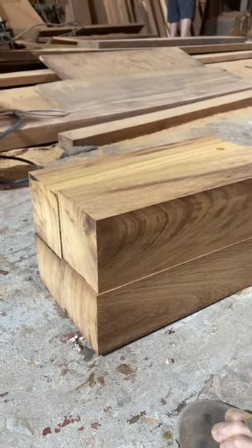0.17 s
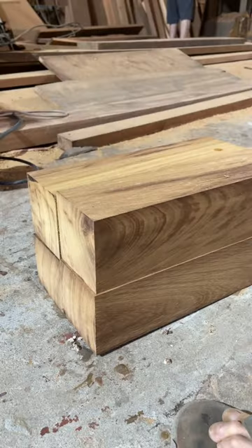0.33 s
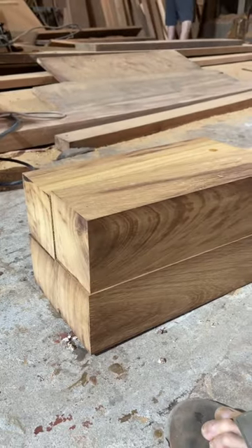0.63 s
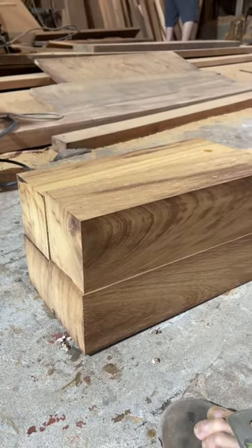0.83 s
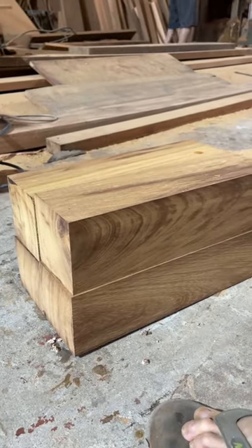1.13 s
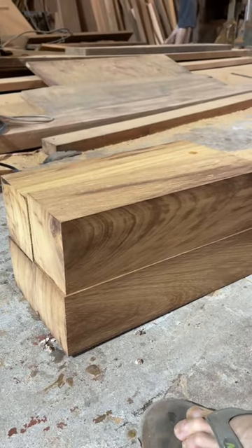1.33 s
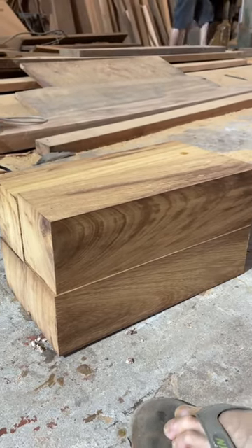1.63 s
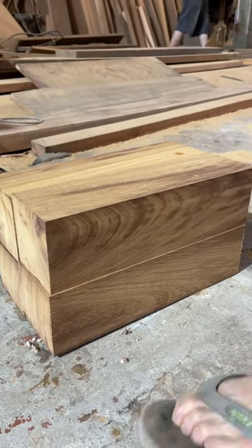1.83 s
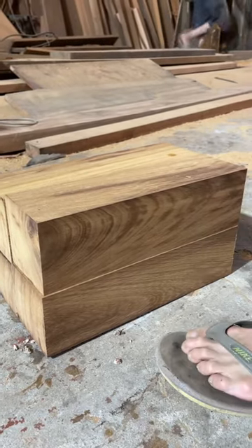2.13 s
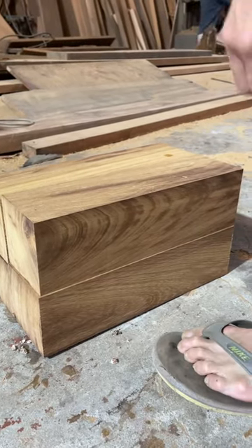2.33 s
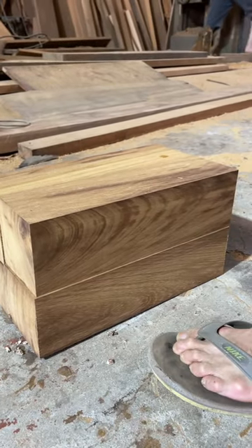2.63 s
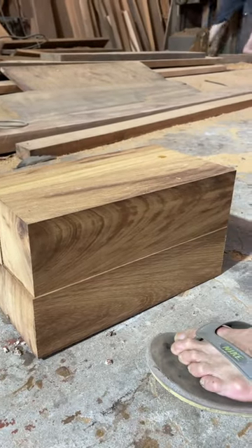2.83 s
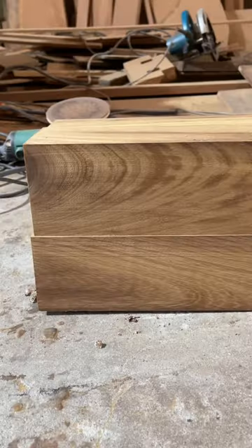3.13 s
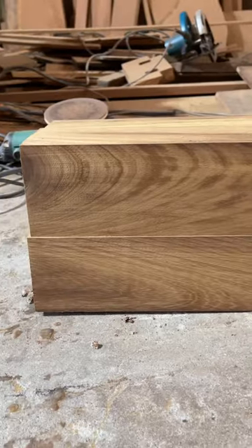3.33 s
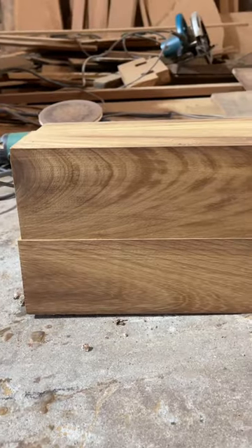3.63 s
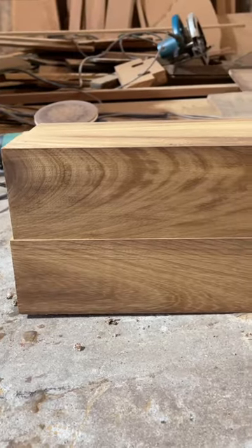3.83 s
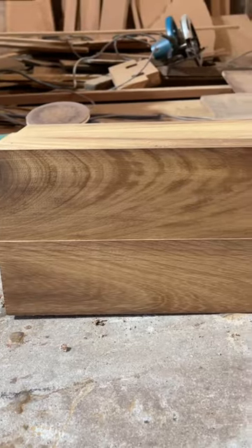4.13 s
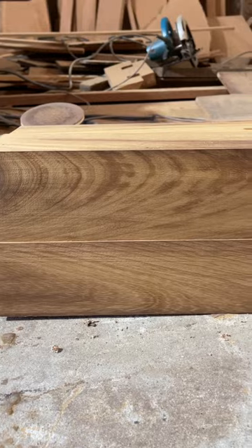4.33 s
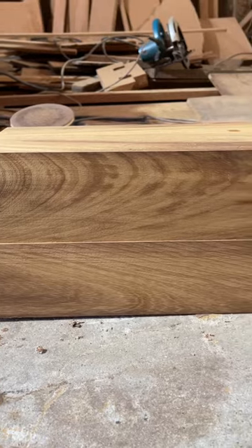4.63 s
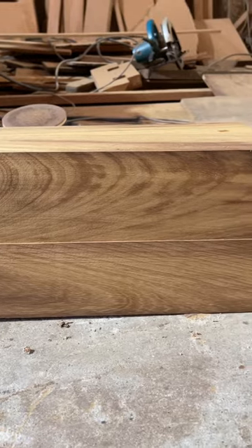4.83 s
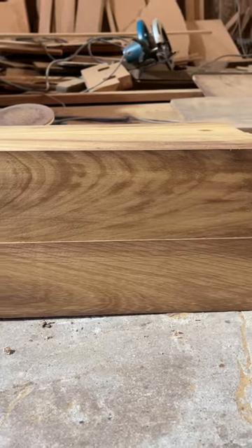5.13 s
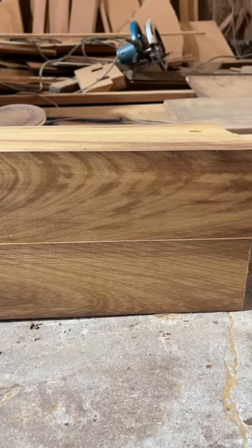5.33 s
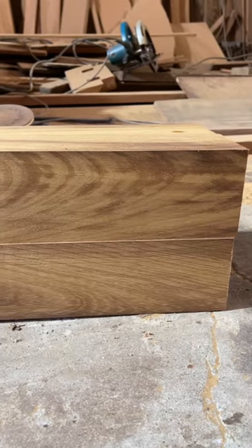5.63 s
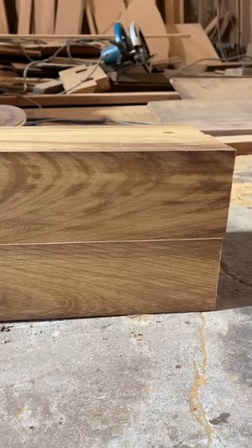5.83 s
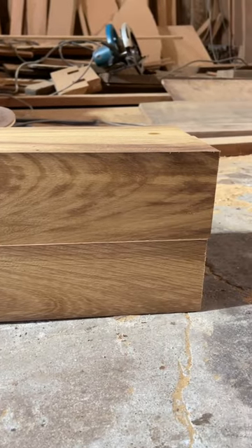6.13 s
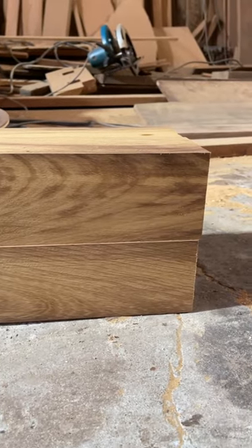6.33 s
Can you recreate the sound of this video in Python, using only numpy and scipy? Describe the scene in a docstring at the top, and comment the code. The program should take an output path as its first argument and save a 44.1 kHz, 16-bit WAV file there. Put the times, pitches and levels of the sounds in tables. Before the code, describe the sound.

A planing machine buzzes and squeals through wood, with a hiss of chips and a short splintering rasp. After a brief sandal scuff and a tiny gap, it runs empty with a steady drone, while a plank knocks sharply and echoes a little. Then a louder, harsher cut begins. The sound is picked up a few metres away in an open workshop, with gusts of wind thumping on the microphone throughout.

```python
"""A harsh, singing buzz opens the scene: a three-knife wood planer cuts a board in an open workshop.
Periodic knife blows force the wood to vibrate at harmonics of the shaft rate, and flying chips hiss.
A sandal scuffs, and the sound breaks off for an instant. The planer idles, humming like a siren as its
knives chop the air, while a plank is knocked down; then it bites into a second board. Throughout, a
breeze buffets the two microphone ports of a phone a few metres away."""
import sys
import numpy as np
from scipy import signal
from scipy.fft import rfft, irfft, next_fast_len
from scipy.io import wavfile
from scipy.ndimage import uniform_filter1d, map_coordinates

SR = 44100
rng = np.random.default_rng(int(sys.argv[2]) if len(sys.argv) > 2 else 0)


def dump_mix(stems):
    """Bounce the given channels to the path in sys.argv[1] as a 16-bit WAV at rate SR."""
    frames = np.atleast_2d(stems).T  # one column per channel
    limited = np.clip(frames, -1, 1)  # hard clip at full scale
    pcm = np.round(limited * 32767).astype(np.int16)
    wavfile.write(sys.argv[1], SR, pcm)


N = 286076
TIME, FREQS = np.arange(N) / SR, np.fft.rfftfreq(N, 1 / SR)
SHAFT_HZ = 79.62
SNAPS = (2.3, .7)  # extra blow of the proudest knife in each board
GRATE_CYCLES, GRATE_HZ = .04, 45  # depth and rate of the phase jitter from uneven blows

# Passes of a board over the knives. Each row: start and end in seconds.
FEED_SPANS = [(-.1, 2.85), (5.715, 6.6)]
# Resonances of the boards as the knives catch them. Each row: start and length in seconds, centre and
# width in Hz, level of the added band in dB relative to the plain cut, level of the squeal in dB.
BOARD_RESONANCES = [(0, 0.36, 2600, 510, 1, -49), (1.009, 0.62, 2448, 220, -8, -26),
                    (1.07, 0.65, 3970, 600, -9, -57), (1.55, 0.034, 4080, 300, 12, -41),
                    (1.963, 0.39, 2625, 226, -20, -32.5), (2.26, 0.53, 2545, 520, 1.5, -40.5),
                    (2.554, 0.29, 5830, 400, -13, -40), (5.743, 0.12, 3105, 160, -11, -28.5),
                    (5.737, 0.075, 3680, 500, -8, -33), (5.76, 0.66, 3660, 190, -12, -29),
                    (6.007, 0.33, 1080, 1620, -16, -52), (6.168, 0.29, 6300, 765, 4.5, -42)]
# How well the motor side of the machine is heard. Each row: time in seconds, gain in dB.
MOTOR_SIDE_GAIN = [(0, -1.5), (2.3, -1), (2.9, 3), (5.6, 2), (6.49, 4)]


def amp(db):
    """Decibels as an amplitude ratio."""
    return 10 ** (np.asarray(db) / 20)


def unit_rms(x):
    """Normalisation to a mean power of 1."""
    return x / np.sqrt(np.mean(x ** 2) + 1e-20)


def curve(rows, column=1):
    """Linear interpolation of one table column over time."""
    rows = np.array(rows)
    return np.interp(TIME, rows[:, 0], rows[:, column])


def bump(s, half):
    """A Gaussian swell that falls to 1/e at `half` seconds either side of its peak."""
    return np.exp(-np.minimum(((TIME - s) / half) ** 2, 50))


def gains(points):
    """A frequency response interpolated on a logarithmic frequency axis."""
    hz, db = np.transpose(points)
    return amp(np.interp(np.log(FREQS + 1), np.log(hz), db))


def colour(x, points):
    """Filtering by multiplication of spectra."""
    return irfft(rfft(x) * gains(points), N)


def wander(rate_hz, size=4096):
    """Low-pass noise of rms 1, for slow random modulation."""
    hz = np.arange(size // 2 + 1) * SR / N
    spectrum = rng.standard_normal((len(hz), 2)) @ [1, 1j]
    slow = unit_rms(irfft(spectrum * np.exp(-(hz / rate_hz) ** 2)))
    return np.interp(np.linspace(0, size - 1, N), np.arange(size), slow)


def tone(cycles, scatter=1.0):
    """A direct sinusoid of rms 1 and its scattered part, each at a random phase."""
    return np.sqrt(2) * np.array([[1], [scatter]]) * np.sin(2 * np.pi * (cycles + rng.random((2, 1))))


def ports(pair, response=1):
    """Interference at two ports: their sum and difference cancel in turn along the spectrum."""
    # Each row: frequency in Hz, phase lead of the left port in radians, correlation from -1 to 1.
    port_relation = [(0, .27, 0), (250, .6, 0), (600, .8, -.1), (1150, .95, -.4), (1800, .25, .3),
                     (2500, .75, .5), (3800, 1.05, .35), (4550, 1.8, .5), (4900, 3.14, .6),
                     (5950, 6.28, .65), (7600, 7.8, .63), (8500, 9, .8), (9400, 9.7, .8), (10700, 11, .65),
                     (11600, 12.57, .6), (12600, 12.25, .6)]
    hz, leads, correlations = np.transpose(port_relation)
    lead, correlation = np.interp(FREQS, hz, leads), np.interp(FREQS, hz, correlations)
    direct, scattered = rfft(pair) * response
    mid = np.cos(lead / 2) * direct
    side = 1j * np.sin(lead / 2) * (correlation * direct + np.sqrt(1 - correlation ** 2) * scattered)
    return irfft(np.array([mid + side, mid - side]), N)


def feeding(board, bite_s=.033):
    """Depth of the knives in one board, ramping between 0 and 1."""
    start, end = FEED_SPANS[board]
    return np.clip(np.minimum(TIME - start, end - TIME) / bite_s, 0, 1)


def strikes(turns, snap, knives=(1, .4, .3)):
    """Three decaying impacts a turn over a steady floor; one knife stands proud and snaps hardest."""
    knife = np.floor(turns * 3).astype(int) % 3
    since_blow = turns * 3 % 1
    return 1 + np.array(knives)[knife] * np.exp(-since_blow / .45) + snap * np.exp(-(turns % 1) / .04)


def buzz(turns, snap, hold_s=.5, flattening=.35, size=1024, count=130):
    """Quasi-periodic excitation: each turn repeats a rattle that changes slowly as the board slides."""
    span = max(2, round(hold_s * count * SR / N))
    rattles = uniform_filter1d(rng.standard_normal((2, 2 * count, size)), span, axis=1)
    rattles = rattles[:, count // 2:][:, :count]
    harmonics = rfft(rattles * strikes(np.arange(size) / size, snap))
    harmonics /= (abs(harmonics) + 1e-9) ** flattening
    order = np.arange(harmonics.shape[-1])
    on_knives = order % 3 == 0
    harmonics *= amp(5 * on_knives) * (order * SHAFT_HZ < SR / 2)
    place = [np.linspace(0, count - 1, N), turns % 1 * size]
    pair = [map_coordinates(shapes, place, order=1, mode="grid-wrap") for shapes in irfft(harmonics)]
    return unit_rms(np.array(pair))


def ringing(start, length, ramp_s=.014, fade_db=-1.5):
    """Envelope of a resonance: a quick attack, a slow fade, a quick release."""
    gate = np.clip(np.minimum(TIME - start, start + length - TIME) / ramp_s + .5, 0, 1)
    return gate * amp(fade_db * np.clip((TIME - start) / length, 0, 1))


def resonating(drive, board):
    """Resonance: for a while, the board reinforces the excitation in a band around each peak."""
    out = drive.copy()
    for start, length, hz, width_hz, db, _ in BOARD_RESONANCES:
        if FEED_SPANS[board][0] < start < FEED_SPANS[board][1]:
            envelope = ringing(start, length)
            on = envelope > 0
            size = next_fast_len(int(on.sum()), True)
            peak = np.exp(-((np.fft.rfftfreq(size, 1 / SR) - hz) / width_hz) ** 2 * 2)
            band = irfft(rfft(drive[:, on], size) * peak, size)[:, :on.sum()]
            out[:, on] += amp(db) * envelope[on] * band
    return out


def sliding(x, depth_db=1.6):
    """Time-varying filtering: as the board slides, patches of its spectrum swell and fade."""
    spectra = signal.stft(x, nperseg=512)[2]
    patches = rng.standard_normal(spectra.shape[1:])
    for _ in range(2):
        patches = uniform_filter1d(uniform_filter1d(patches, 3, axis=0), 22, axis=1)
    return signal.istft(spectra * amp(depth_db * unit_rms(patches)), nperseg=512)[1][:, :N]


def cutting(turns, split_hz=4950, chatter_hz=8.3, chatter_db=1.37):
    """Forced vibration: knife blows ring the board; fibres and chips add a puff of noise to each."""
    # One table a board. Each row: time in seconds, knife force and chip hiss in relative dB.
    passes = [
        [(0.02, -29, -32), (0.6, -38.5, -34.5), (0.97, -34.5, -35), (1.1, -26.5, -32), (1.66, -29.5, -33),
         (1.9, -29, -33), (2.49, -34.5, -36), (2.66, -32, -31), (2.82, -36.5, -32.5)],
        [(5.76, -26.5, -23.5), (5.944, -29.5, -26), (6.174, -23.5, -26), (6.312, -25.5, -19.5),
         (6.48, -27, -26)],
    ]
    # One spectrum a board. Each row: frequency in Hz, relative density in dB.
    board_spectra = [
        [(300, -76.5), (550, -63.5), (750, -69), (1050, -68.5), (1300, -65.5), (1800, -63), (2400, -61),
         (3200, -65.5), (4200, -59.5), (5500, -52.5), (7500, -54.5), (9700, -51), (11200, -57), (12600, -87)],
        [(300, -103), (550, -78), (750, -56.5), (1000, -58), (1300, -58), (1800, -58), (2400, -53.5),
         (3100, -50.5), (3700, -51.5), (4600, -56), (6400, -64), (9500, -60.5), (11200, -69), (12600, -85)],
    ]
    depth = amp(.6 * rng.standard_normal(1024)[turns.astype(int)])  # no two turns cut equally deep
    low = 1 / (1 + (FREQS / split_hz) ** 16)
    # Wood, then chips. Each row: frequency response, gain in dB, factor on the share of noise.
    bands = [(low, -2.0, .7), (1 - low, -2.6, 1.1)]
    out = 0
    for board, (levels, spectrum) in enumerate(zip(passes, board_spectra)):
        periodic = buzz(turns, SNAPS[board])
        puffs = unit_rms(rng.standard_normal((2, N)) * strikes(turns, SNAPS[board]) * amp(3 * wander(30)))
        heavier_db = curve(levels) - np.mean(levels, axis=0)[1]
        noise_share = (.44, .29)[board] - .025 * heavier_db  # a heavier cut rings more cleanly
        for column, (band, gain_db, noisiness) in enumerate(bands, 1):
            rough = np.clip(noise_share * noisiness, 0, 1)
            drive = resonating(np.sqrt(1 - rough) * periodic + np.sqrt(rough) * puffs, board)
            heard = ports(drive, band * gains(spectrum))
            heard /= np.sqrt(uniform_filter1d(heard.mean(0) ** 2, size=3300))  # steady the power
            out = out + heard * feeding(board) * amp(curve(levels, column) + gain_db)
    out = sliding(out) * depth
    bobbing = np.sin(2 * np.pi * (chatter_hz * TIME + .5 * wander(3.85)))  # the board on the table
    return out * amp(chatter_db * bobbing)


def singing(turns, waver_db=1.7, waver_hz=14):
    """Shaft harmonics swell in the boards; uneven blows modulate their amplitude and phase."""
    # Each row: peak time and half-width in seconds, multiple of the shaft rate, level in dB.
    notes = [(0.03, 0.079, 33, -41), (0.055, 0.042, 53, -37), (0.18, 0.52, 44, -44), (0.2, 0.051, 32, -35),
             (0.253, 0.34, 37, -42.5), (1.05, 0.54, 50, -40.5), (1.196, 0.35, 29, -42),
             (1.25, 0.21, 27, -37), (1.3, 0.15, 45, -43), (1.413, 0.45, 38, -39), (1.5, 0.28, 65, -37.5),
             (1.723, 0.73, 16, -42), (1.68, 0.25, 24, -43.5), (1.857, 0.81, 22, -41),
             (1.864, 0.19, 32, -36.5), (2.037, 0.15, 68, -37), (2.26, 0.18, 36, -39),
             (2.315, 0.24, 19, -43.5), (2.36, 0.23, 31, -39.5), (2.45, 0.4, 27, -46.5),
             (2.72, 0.25, 29, -43), (5.8, 0.048, 21, -32), (5.823, 0.12, 34, -35), (5.85, 0.13, 36, -36.5),
             (5.95, 0.15, 43, -33), (6.1, 0.16, 67, -36), (6.083, 0.23, 15, -39), (6.114, 0.11, 40, -33),
             (6.14, 0.77, 49, -34.5), (6.146, 0.11, 45, -29), (6.15, 0.23, 12, -32), (6.167, 0.15, 36, -30),
             (6.186, 0.15, 34, -29), (6.16, 0.08, 24, -37.5), (6.197, 0.097, 73, -32), (6.2, 0.24, 82, -36),
             (6.304, 0.19, 55, -49), (6.423, 0.14, 30, -33.5), (6.42, 0.21, 39, -37),
             (6.402, 0.11, 47, -34)]
    unrest = np.where(TIME < FEED_SPANS[1][0], 1.0, 1.1)  # the second board wavers more
    out = np.zeros((2, N))
    for s, half, order, db in notes:
        envelope = amp(db) * bump(s, half)
        on = envelope > 1e-5
        waver, grate = (unrest[on] * wander(hz)[on] for hz in (waver_hz, GRATE_HZ))
        note = tone(order * turns[on] + GRATE_CYCLES * grate)
        out[:, on] += envelope[on] * amp(waver_db * waver) * note
    return out * (feeding(0) + feeding(1))


def squealing(turns, fade_db=-7, narrowing_s=.8, lag_turns=.12):
    """A resonance struck once a turn by the proud knife: five harmonics under a narrowing peak."""
    out = np.zeros((2, N))
    for start, length, hz, width_hz, _, db in BOARD_RESONANCES:
        progress = np.clip((TIME - start) / length, 0, 1)
        envelope = amp(db + fade_db * progress ** 2) * ringing(start, length)
        on = envelope > 0
        width = .55 * width_hz * np.exp(-abs(TIME[on] - start) / narrowing_s)
        phase = GRATE_CYCLES * wander(GRATE_HZ)[on] + rng.random((2, 1))
        for order in round(hz / SHAFT_HZ) + np.arange(-2, 3):
            share = 1 / (1 + (2 * (order * SHAFT_HZ - hz) / width) ** 2)
            cycles = order * (turns[on] - lag_turns) + phase
            out[:, on] += envelope[on] * share * np.sqrt(2) * np.sin(2 * np.pi * cycles)
    return out * (feeding(0) + feeding(1))


def siren_hum(turns, overtones_db=-31.5, waver_db=3.3):
    """The siren principle: knives passing the table lips chop the air three times a turn."""
    # The fundamental. Each row: time in seconds, level in dB.
    levels = [(0, -39), (.35, -37.5), (.78, -29.5), (2.55, -27), (2.85, -30.5), (3.2, -34), (3.58, -26.5),
              (4.3, -24.5), (4.5, -38), (4.65, -26), (5.65, -23.5), (5.8, -31), (6.0, -25.5), (6.38, -27.5),
              (6.49, -51)]
    # Overtones, which waver in the room. Each row: multiple of the shaft rate, relative level in dB.
    orders = [(6, -12.5), (9, -20.5), (12, -19.5), (24, -24.5)]
    overtones = sum(amp(db + waver_db * wander(1.3)) * tone(order * turns) for order, db in orders)
    return tone(3 * turns, scatter=.26) * amp(curve(levels)) + overtones * amp(overtones_db)


def motor(slip_cycles=.17):
    """Rotating motor, belt and bearings radiate tones whose phases drift as the belt slips."""
    # Each row: frequency in Hz, relative level in dB.
    partials = [(708, -46), (737, -52), (786, -50), (866, -50.5), (939, -60), (1179, -56.5), (2876, -58.5),
                (2940, -58)]
    slips = [slip_cycles * wander(3) for _ in partials]
    tones = sum(amp(db) * tone(hz * TIME + slip) for (hz, db), slip in zip(partials, slips))
    return tones * amp(curve(MOTOR_SIDE_GAIN))


def rushing_air(flutter_db=.57):
    """Aerodynamic noise of the spinning cutter block, with a whistle near 3 kHz."""
    # Each row: frequency in Hz, relative density in dB.
    air_spectrum = [(20, -111), (60, -57), (150, -67.5), (260, -58.5), (400, -75), (600, -72), (900, -71),
                    (1300, -79), (2000, -81), (2750, -84), (2940, -80), (3150, -84), (7000, -89),
                    (10000, -84.5), (12600, -110)]
    air = colour(rng.standard_normal((2, N)), air_spectrum) * np.sqrt(SR / 2)
    return air * amp(flutter_db * wander(28) + curve(MOTOR_SIDE_GAIN))


def whine(hz=999.6):
    """Magnetic forces in the motor radiate one steady pitch."""
    # Each row: time in seconds, level in dB.
    levels = [(0, -90), (2.6, -51), (3.9, -47.5), (4.5, -40), (5.3, -44.5), (6.1, -40), (6.49, -60)]
    return amp(curve(levels)) * tone(hz * TIME)


def wind(eddies_per_s=5.1, eddy_half_s=.016, eddy_db=6, steadiness=.36):
    """Turbulent pressure on the microphone: breeze, random eddies and buffets add in power."""
    # The breeze, which also scales the eddies. Each row: time in seconds, level in dB.
    breeze = [(0, -56), (.4, -32.5), (.6, -50.5), (1.2, -43), (2.2, -42), (3.0, -32), (3.75, -49),
              (4.4, -37.5), (5.2, -40.5), (5.75, -44.5), (6.49, -30)]
    # Each row: peak time in seconds, level in dB, flutter over rumble in dB, half-width in seconds.
    buffets = [(0.02, -20.5, -17, 0.021), (0.074, -14, -6, 0.0066), (0.184, -24.5, -1, 0.039),
               (0.354, -29, -12, 0.016), (0.716, -27.5, -9, 0.011), (0.79, -32, -11, 0.016),
               (2.444, -24, -1, 0.022), (2.51, -24, 1, 0.022), (2.647, -17.5, -21, 0.01),
               (2.735, -19.5, 3.5, 0.0036), (2.951, -20, 15, 0.0081), (3.264, -23, 15, 0.0064),
               (3.305, -17.5, 3, 0.013), (3.57, -28.5, -13, 0.0081), (3.63, -16.5, -12, 0.0069),
               (3.892, -26, -3.5, 0.013), (3.962, -28, -5, 0.018), (4.03, -23.5, -2, 0.029),
               (4.131, -20.5, -16, 0.0057), (4.326, -25, -22, 0.02), (4.419, -18, 2, 0.02),
               (4.503, -26.5, -3, 0.042), (4.606, -25, 15, 0.015), (4.949, -21.5, 6, 0.0091),
               (5.003, -22, -14, 0.017), (5.434, -27, -4, 0.044), (5.651, -18, -4, 0.0094),
               (5.724, -20, -19, 0.014), (5.926, -26.5, -6, 0.018), (6.265, -19, 2, 0.017),
               (6.461, -28, 24, 0.043)]
    # Low rumble and higher flutter. Each row: frequency in Hz, relative density in dB.
    rumble_spectrum = [(18, -55), (35, -8.5), (60, 0), (110, 3), (190, 1), (300, -4.5), (600, -34),
                       (1500, -89)]
    flutter_spectrum = [(80, -40), (200, -7.5), (300, -2.5), (420, -6), (600, -15.5), (1000, -34),
                        (3000, -80)]
    arrivals = rng.random(N) < eddies_per_s / SR
    eddy = np.exp(-((TIME[:SR // 2] - .25) / eddy_half_s) ** 2)
    eddies = signal.fftconvolve(arrivals * 1., eddy, "same")
    rumble_power = amp(curve(breeze)) ** 2 * (1 + amp(eddy_db) ** 2 * eddies)
    flutter_power = rumble_power * amp(-8) ** 2
    for s, db, bright_db, half in buffets:
        power = amp(db) ** 2 / (1 + amp(bright_db) ** 2) * bump(s, half)
        rumble_power += power
        flutter_power += power * amp(bright_db) ** 2
    out = 0
    for power, spectrum in ((rumble_power, rumble_spectrum), (flutter_power, flutter_spectrum)):
        noise = colour(rng.standard_normal((2, N)), spectrum)
        noise /= uniform_filter1d(noise ** 2, size=900) ** (steadiness / 2)
        out = out + unit_rms(noise) * np.sqrt(power)
    return out


def tearing(turns, grain_db=2):
    """Fracture noise: the grain splinters in uneven surges, in step with the knives."""
    # Each row: peak time in seconds, level in dB, half-width in seconds.
    tears = [(1.73, -31, 0.018), (1.814, -30, 0.14)]
    # Each row: frequency in Hz, relative density in dB.
    splinter_spectrum = [(500, -16), (1100, -9), (1700, -1.5), (2500, -4), (3300, -2.5), (4200, -9),
                         (6000, -6.5), (12000, -22)]
    envelope = sum(amp(db) * bump(s, half) for s, db, half in tears)
    fibres = rng.standard_normal((2, N)) * strikes(turns, SNAPS[0]) * amp(grain_db * wander(120))
    return envelope * unit_rms(colour(fibres, splinter_spectrum))


def sandal_scuffs():
    """Friction noise: a sole drags grit over concrete in short rasps."""
    # Each row: peak time in seconds, level in dB, half-width in seconds.
    scuffs = [(2.416, -26, 0.019), (2.516, -36, 0.039), (2.7, -35, 0.046)]
    # Each row: frequency in Hz, relative density in dB.
    grit_spectrum = [(600, -42), (1150, -4), (1400, -1), (1700, -9), (2100, -25), (3200, -6.5), (4500, -35),
                     (7000, -10), (12000, -21)]
    envelope = sum(amp(db) * bump(s, half) for s, db, half in scuffs)
    return envelope * unit_rms(colour(rng.standard_normal((2, N)), grit_spectrum))


def plank_knocks(crack_s=.0033, db_per_octave=-5, echo_t60_s=.76):
    """Impacts crack and excite a plank's damped modes; stacked timber scatters them into an echo."""
    # Each row: start in seconds, level in dB, best-excited frequency in Hz, rise in seconds,
    # relative level of the crack in dB.
    knocks = [(3.3118, -9, 1320, 0.0017, -1.5), (3.3352, -11, 3000, 0.0014, -5.5),
              (3.356, -17.5, 1810, 0.0022, 3)]
    # Each row: frequency in Hz, relative density in dB.
    crack_spectrum = [(500, -12), (1400, -2.5), (2600, -5), (5000, -17.5), (6800, -17), (11000, -28)]
    # Each row: frequency in Hz, relative level in dB, time to decay by 60 dB in seconds.
    modes = [(983, -20, 0.2), (1352, -1, 0.076), (1842, -18, 0.16), (2430, -16, 0.05), (2776, -6.5, 0.069),
             (3980, -21, 0.34), (4030, -23.5, 0.22)]
    t = TIME[:SR // 2]
    rings, cracks = np.zeros((2, 2, N))
    noise = unit_rms(colour(rng.standard_normal((2, N)), crack_spectrum))
    for s, level_db, best_hz, rise_s, crack_db in knocks:
        part = slice(round(s * SR), round(s * SR) + len(t))
        blow = amp(level_db) * (1 - np.exp(-t / rise_s))
        for hz, db, t60 in modes:
            mode_db = db + db_per_octave * abs(np.log2(hz / best_hz))
            rings[:, part] += blow * amp(mode_db - 60 * t / t60) * np.sin(2 * np.pi * hz * t)
        cracks[:, part] += blow * amp(crack_db) * noise[:, part] * np.exp(-t / crack_s)
    tail = rng.standard_normal((2, len(t))) * amp(-60 * t / echo_t60_s) * (t > .006)
    tail /= np.linalg.norm(tail[0])
    echo = signal.fftconvolve(amp(-12) * rings + amp(-4) * cracks, tail, axes=1)[:, :N]
    return rings + cracks + echo


def scene():
    """Superposition: one unsteady shaft, a shade slower in the second board, times hum and cut."""
    shaft_hz = np.interp(TIME, [FEED_SPANS[0][1], FEED_SPANS[1][0]], [SHAFT_HZ, SHAFT_HZ - .12])
    turns = np.cumsum(shaft_hz) / SR + .004 * wander(2) + .0005 * wander(25)
    cut = cutting(turns)
    wood = singing(turns) + squealing(turns) + tearing(turns)
    machine = siren_hum(turns) + motor() + rushing_air() + whine()
    return cut + ports(wood + machine + wind() + plank_knocks() + sandal_scuffs())


def record(dry):
    """Gating and band limiting: the sound dies for an instant, and a low-pass trims the top treble."""
    # In order, in seconds: the fade begins, the fade is nearly done, silence, the sound is back.
    break_times = (2.832, 2.841, 2.88, 2.881)
    gate = np.interp(TIME, break_times, [1, .04, 0, 1])
    low_pass = signal.firwin(511, 12900, window=("kaiser", 9), fs=SR)
    return signal.oaconvolve(dry * gate, low_pass[None], "same")


dry = scene()
out = record(dry)
dump_mix(out)
```